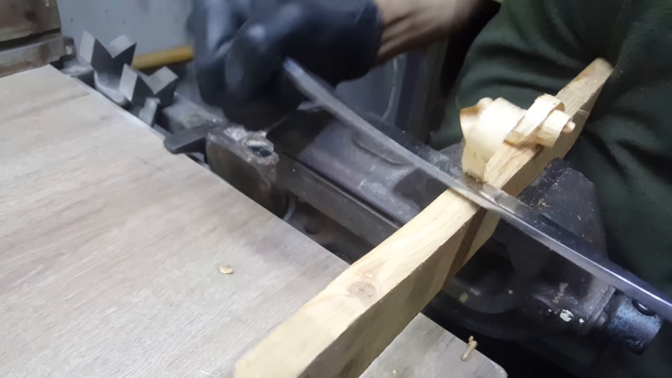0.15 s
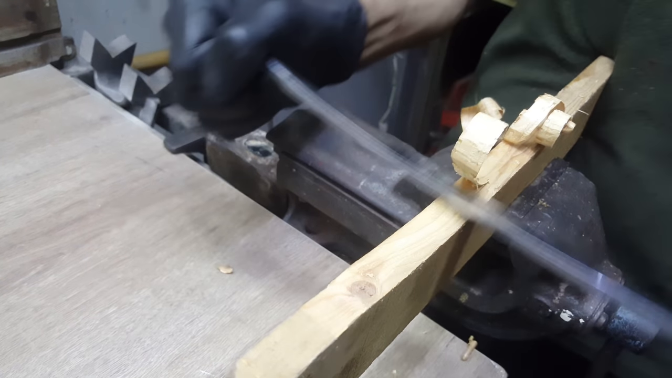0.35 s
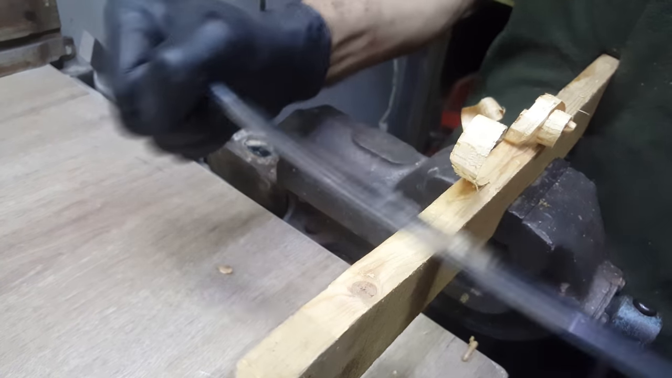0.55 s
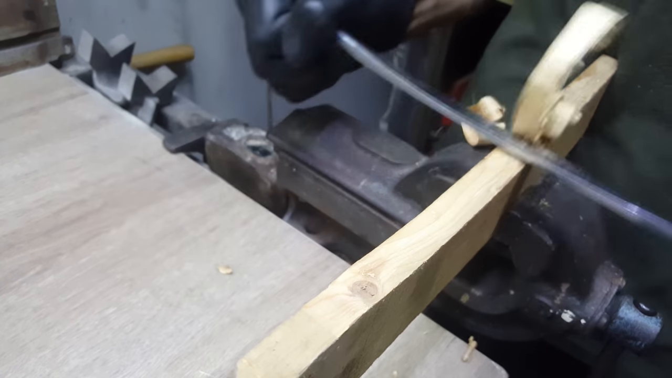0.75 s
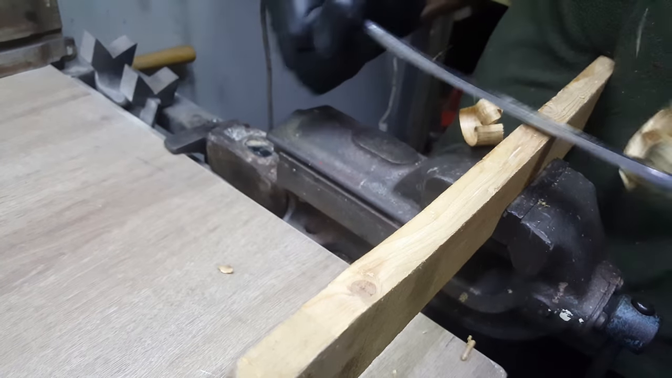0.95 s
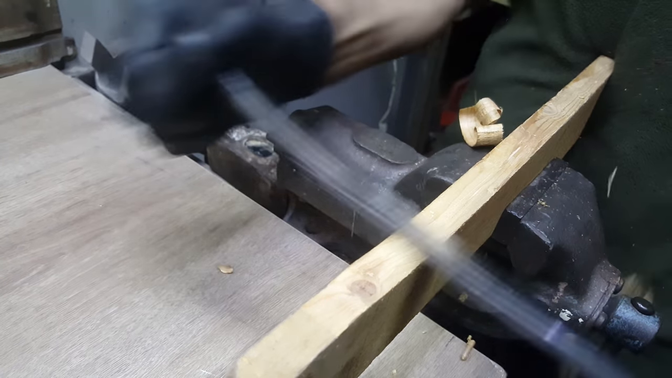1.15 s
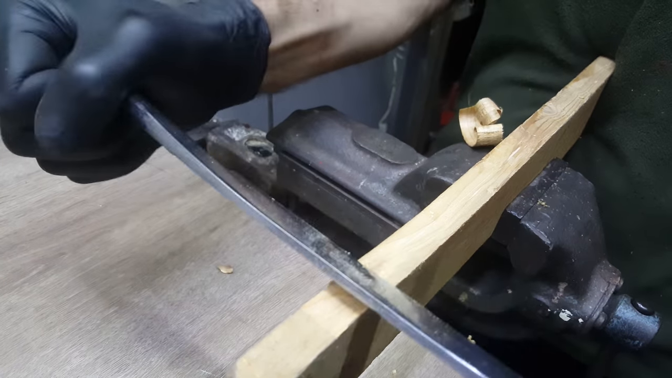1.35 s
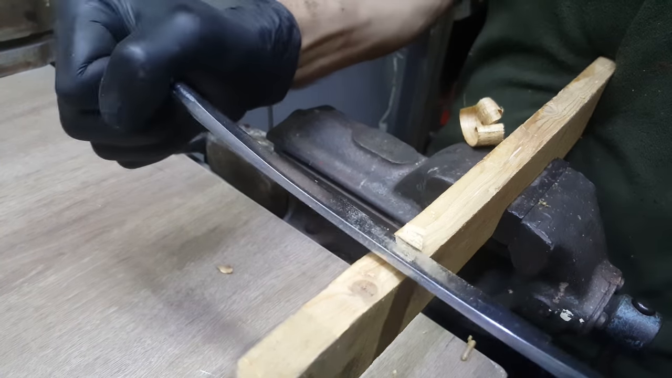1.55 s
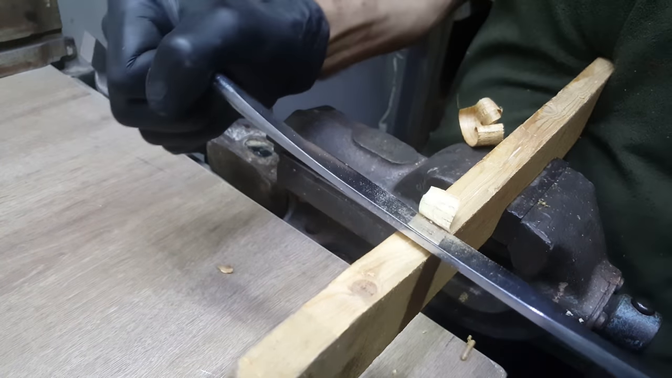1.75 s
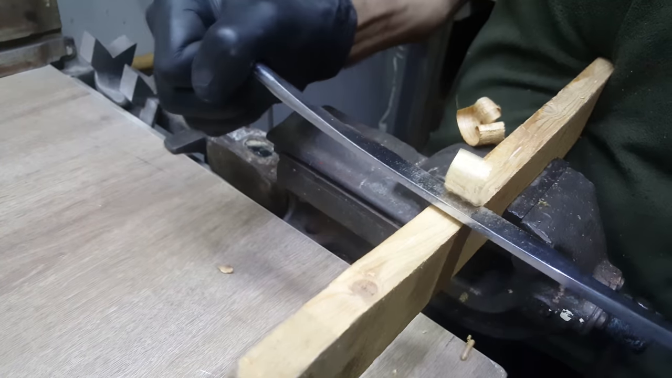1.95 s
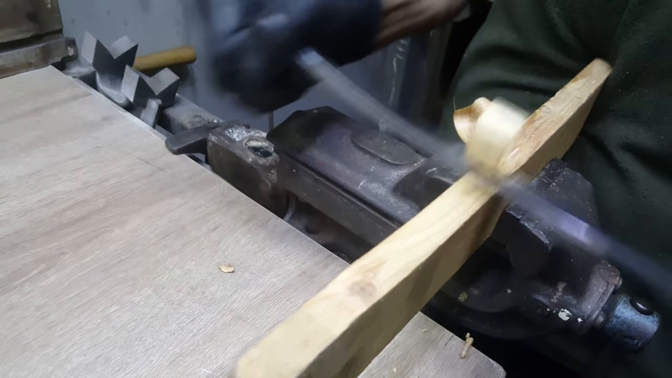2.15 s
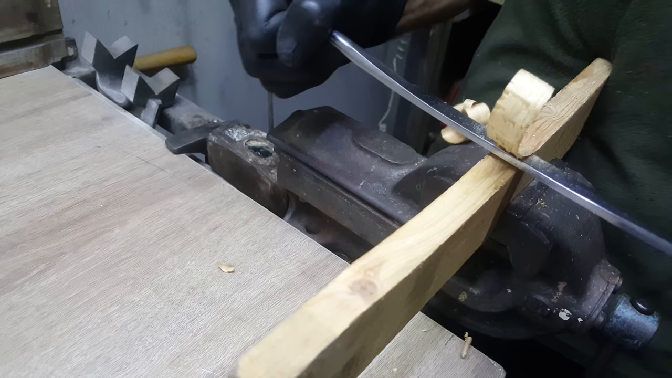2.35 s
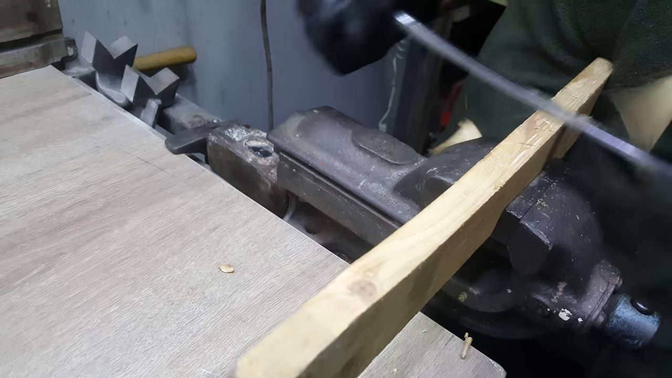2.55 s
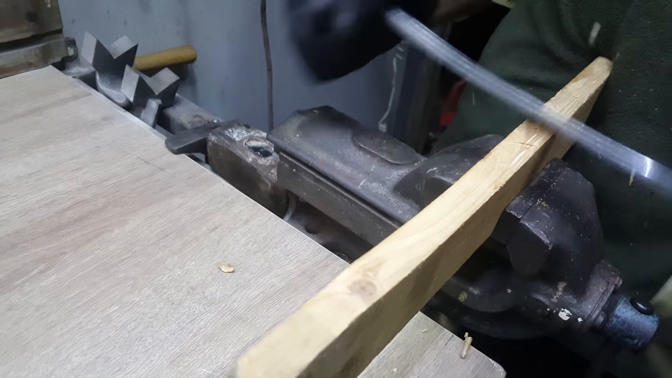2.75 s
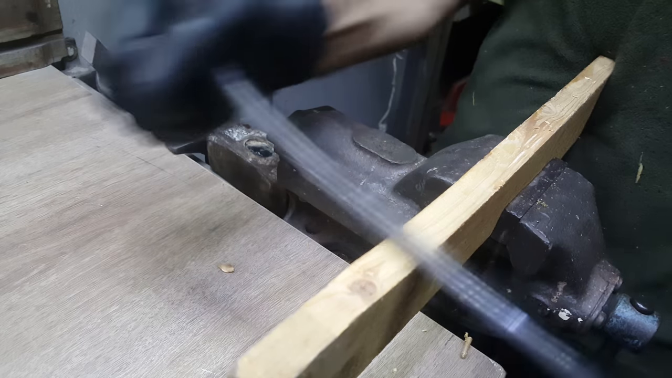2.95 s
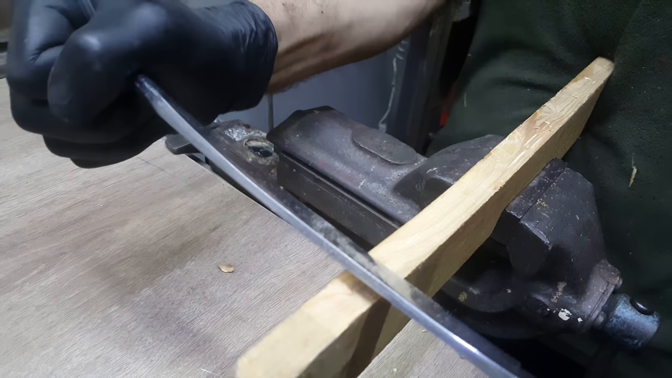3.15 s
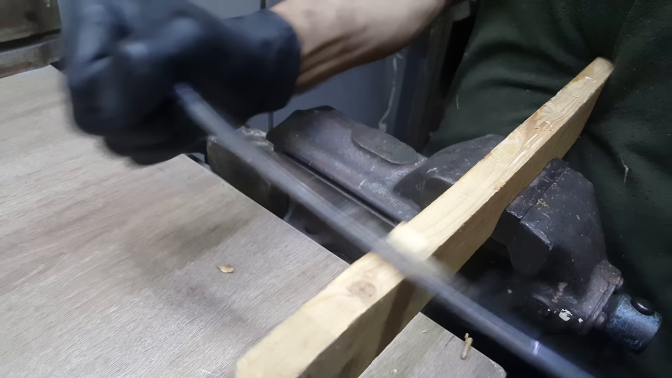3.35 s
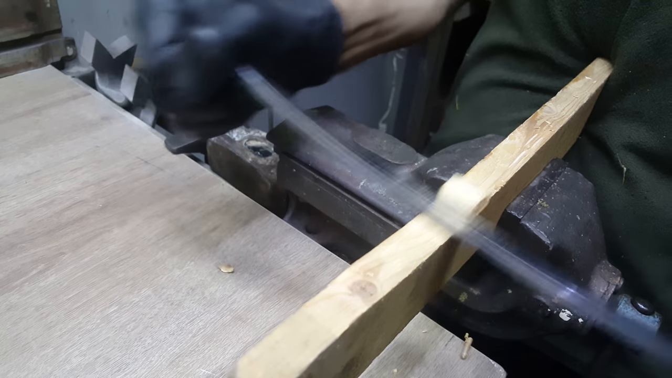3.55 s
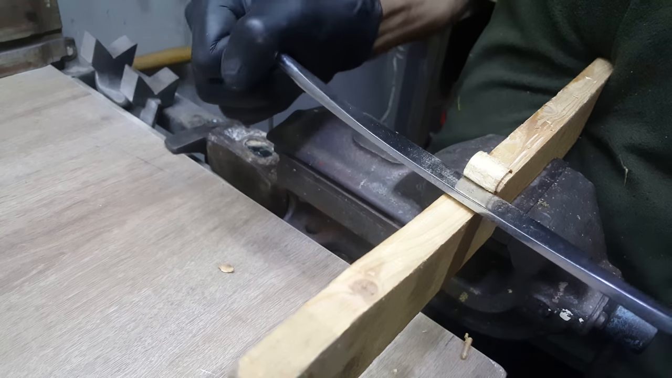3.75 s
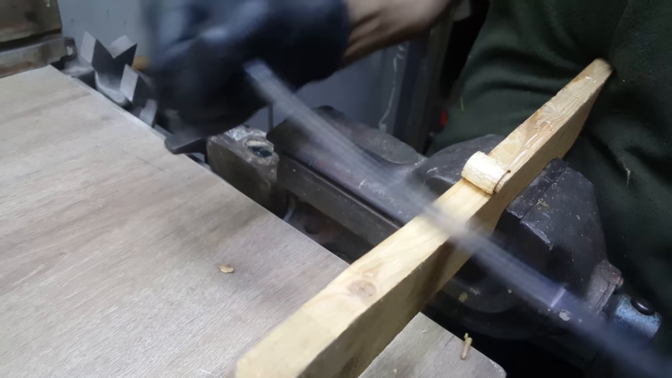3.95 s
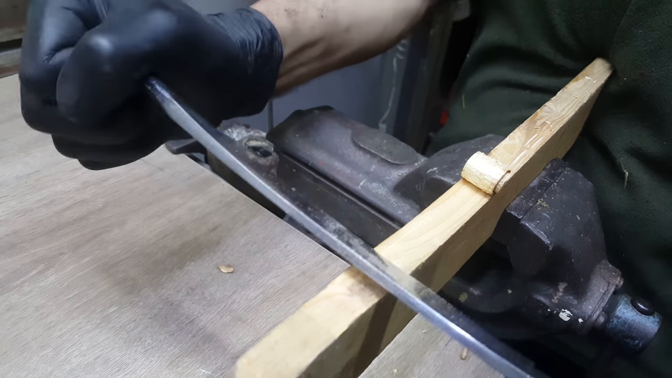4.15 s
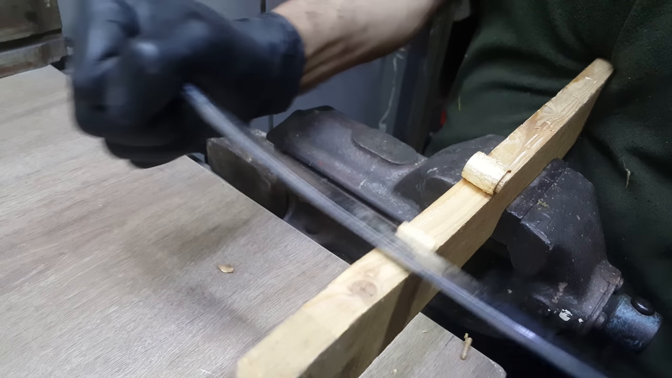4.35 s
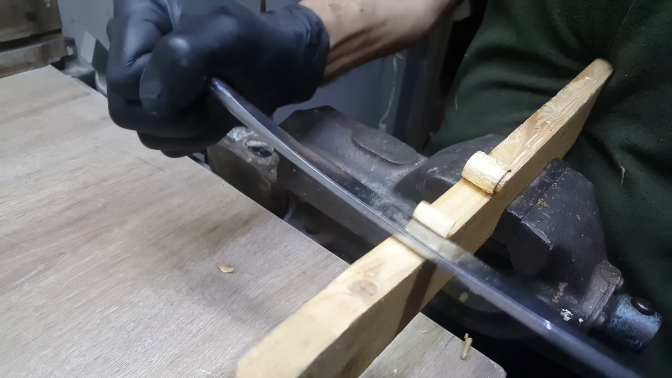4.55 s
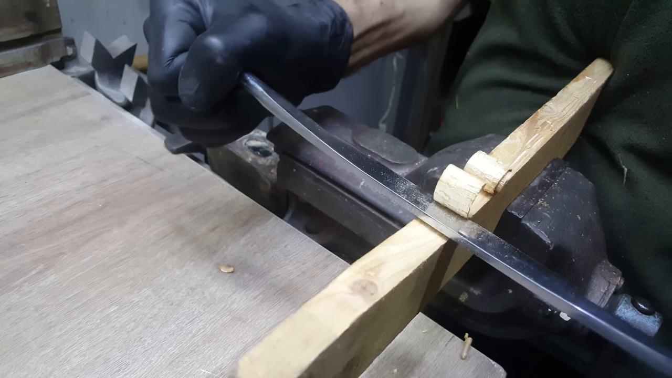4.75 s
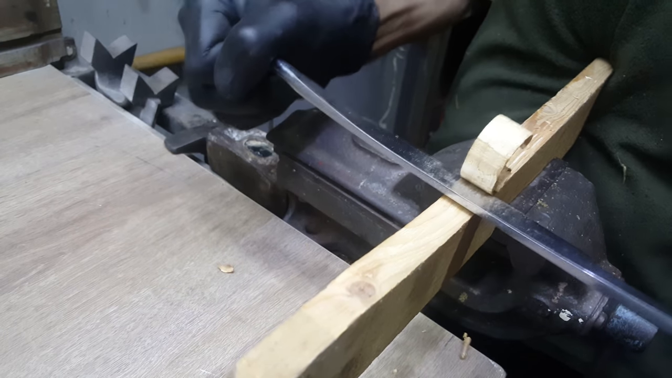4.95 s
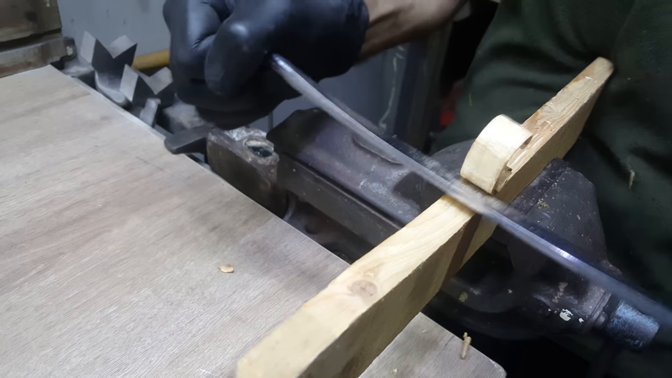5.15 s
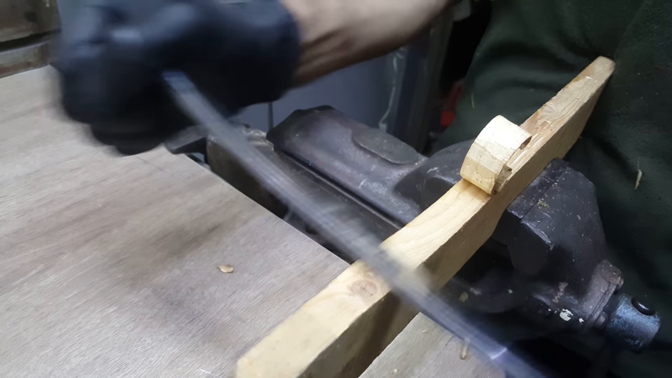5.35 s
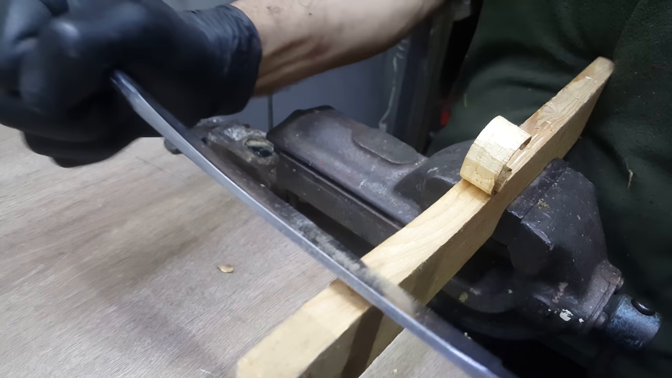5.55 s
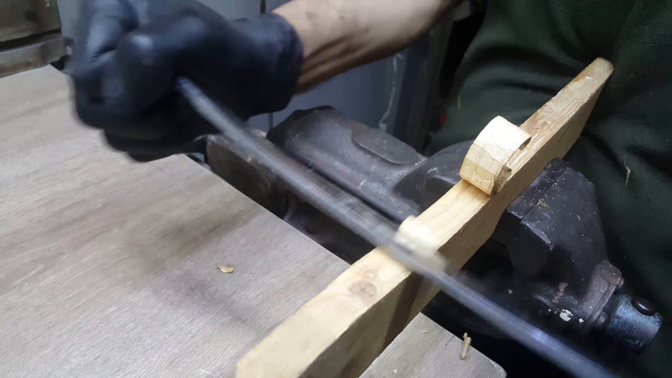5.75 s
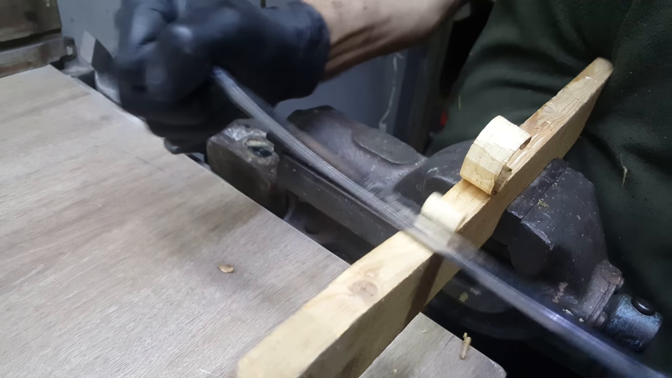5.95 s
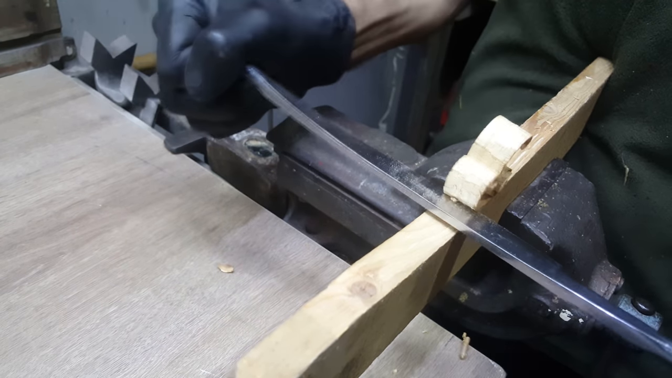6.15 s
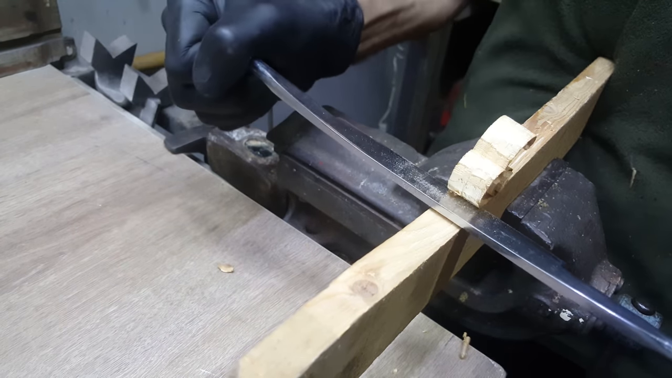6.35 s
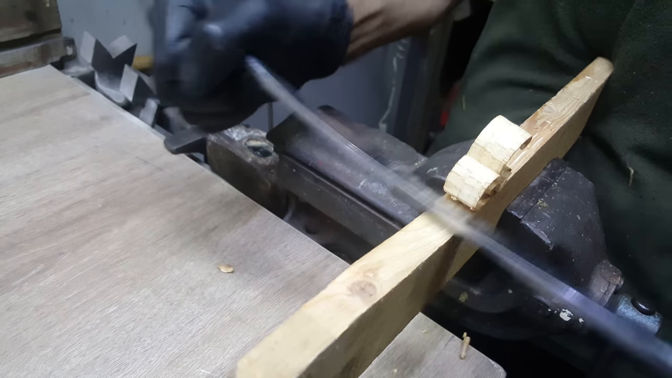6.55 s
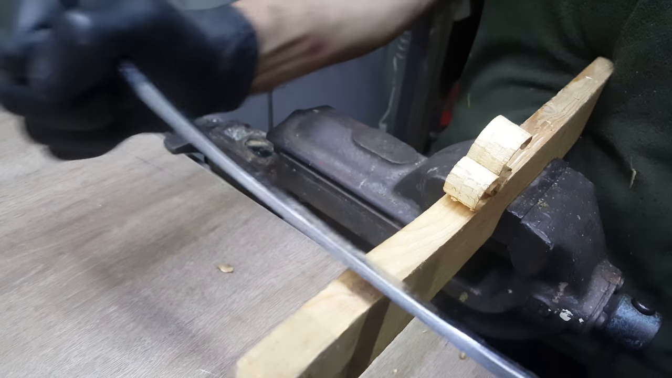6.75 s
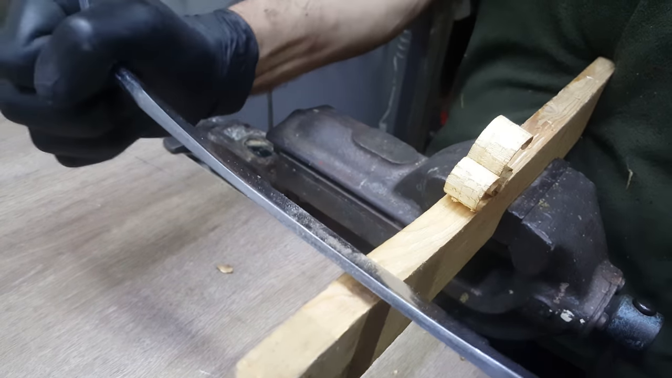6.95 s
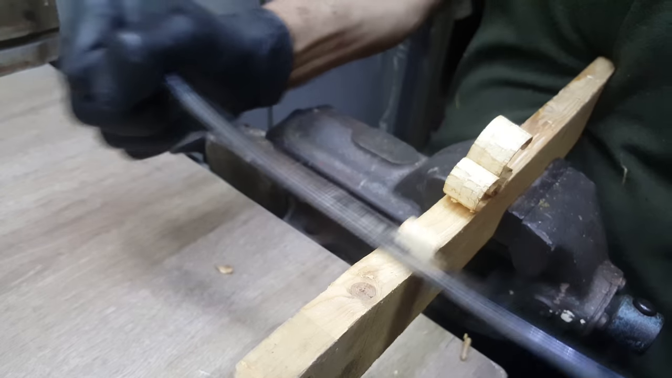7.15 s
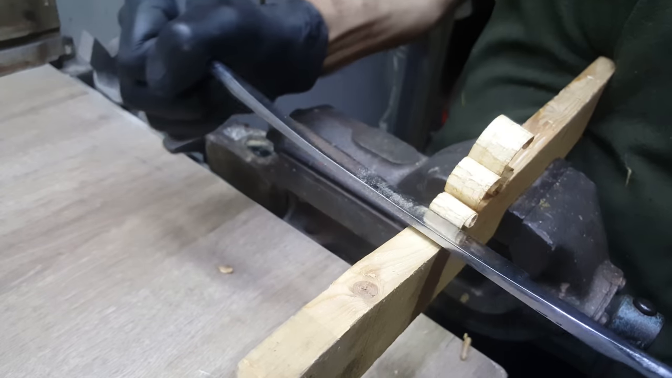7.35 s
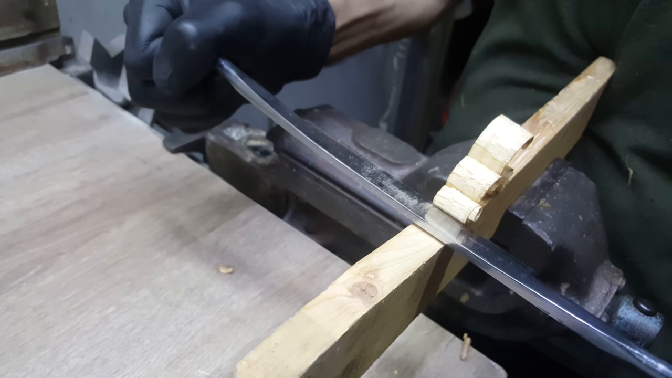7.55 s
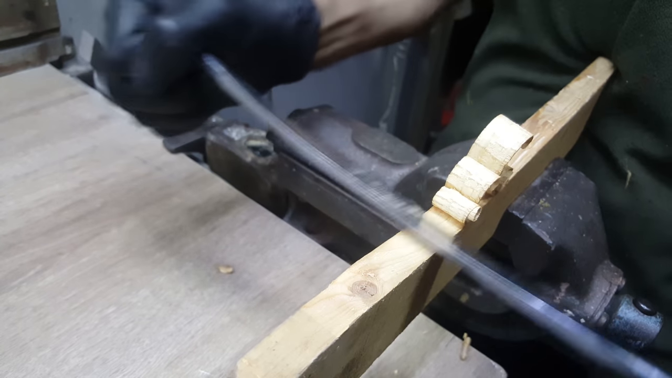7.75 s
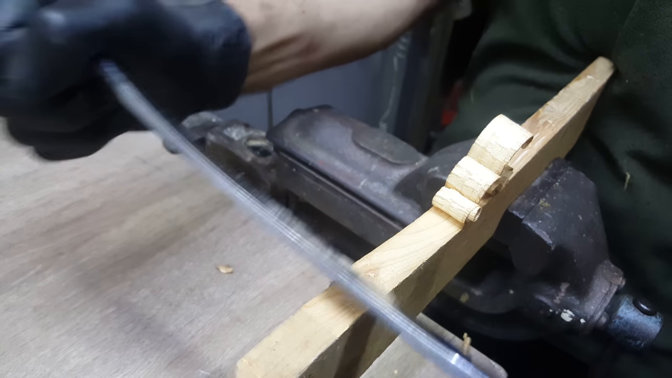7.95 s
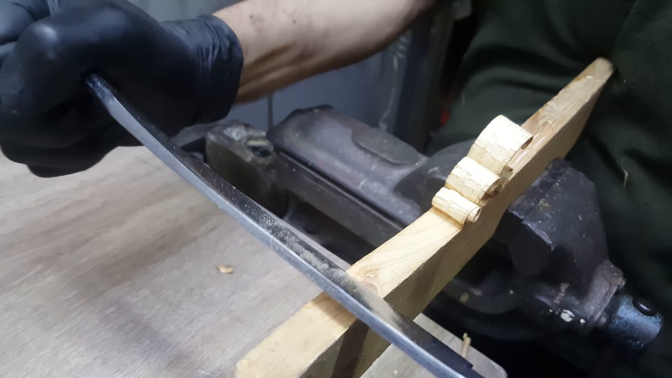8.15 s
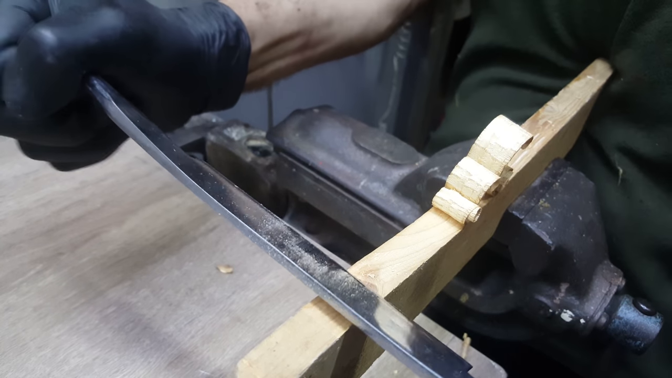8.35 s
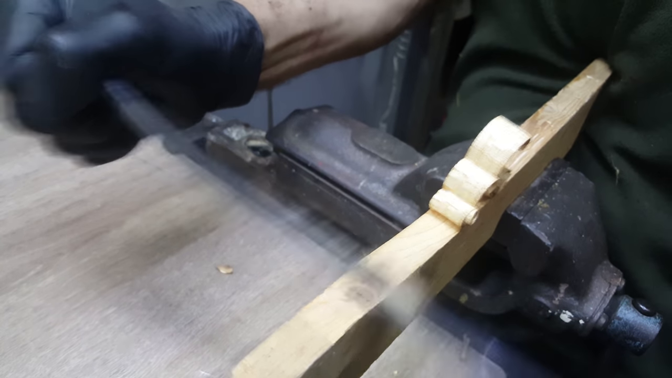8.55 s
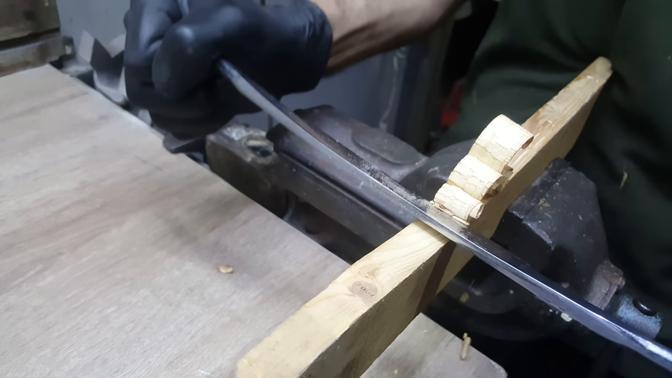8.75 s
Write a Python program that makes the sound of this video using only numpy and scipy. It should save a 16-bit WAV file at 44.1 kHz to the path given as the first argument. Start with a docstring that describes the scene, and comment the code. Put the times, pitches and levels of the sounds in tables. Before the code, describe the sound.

Close workshop woodcutting: a steel blade scrapes and crackles through wood in bursts, snapping splinters and thudding the bench, with ticks and light rubs between.

```python
"""A draw knife cuts along a softwood board clamped in a bench vise, close to two microphones in a small workshop.
The edge sticks and slips: uneven pushes shake bench and board, and sprays of tiny clicks make the rasp.
Splinters snap as hard clicks with noise bursts; sudden releases clunk and the bench lurches on low notes.
Between pulls the blade touches down with ticks and knocks, and slides back with a rub, a swish and a hiss.
The steel sings a few times as a wavering tone, near reflections and a room tail follow, and faint air runs on."""
import sys
import numpy as np
from scipy import signal
from scipy.fft import rfft, irfft, next_fast_len
from scipy.io import wavfile
from scipy.ndimage import uniform_filter1d

SR = 44100
rng = np.random.default_rng(int(sys.argv[2]) if len(sys.argv) > 2 else 0)


def wrap_up_sound(samples):
    """Save the sound to the file named by the first command line argument, as 16-bit audio."""
    columns = np.atleast_2d(samples).T
    # keep every value between -1 and 1, then stretch to whole-number steps
    tamed = np.clip(columns, -1, 1)
    steps = np.round(tamed * 32767).astype(np.int16)
    wavfile.write(sys.argv[1], SR, steps)


N = 392478
T = np.arange(N) / SR

# Event levels and mode strengths below are relative: each layer is trimmed again where it is mixed.

# the blade's bending mode sings: (start [s], end [s], level [dB])
SINGING_NOTES = [(-0.02, 0.125, -60.5), (1.81, 2.03, -58), (2.04, 2.175, -43.5)]
# splinters break: (start [s], crack [dB], woody body [dB], brittle top [dB])
SPLINTER_SNAPS = [(0.1339, -0.5, -10.5, -2.5), (0.153, -13, -19.5, -12), (0.1658, -15, 3, -16),
                  (0.1847, -15, -8.5, -5.5), (0.1967, -16, -7.5, -7.5), (0.718, -6.5, -9, -5.5),
                  (0.722, -4.5, -12, -8.5), (0.734, -7.5, -13.0, -5.5), (0.7804, -15, -2.5, -3.5),
                  (0.868, -13, -17.5, -16), (0.88, -18.5, -18.5, -19), (1.115, -42, -36, -51),
                  (1.8947, -18.5, -13.5, -22.5), (1.9253, -5.5, -15.5, -14), (1.9634, -3.5, -13.5, -12),
                  (2.0078, -10, -21, -22.5), (2.0731, -15.5, -31.5, -21), (2.1685, 1, -4.5, -14.5),
                  (2.2071, -4, -14, -11), (2.24, -2.5, -1.5, -10.5), (2.2569, -12.5, -15, -10.5),
                  (2.2788, -1.5, -16.0, -5.5), (2.2919, -6.5, -19, -4.5), (2.4188, -21, -39, -25),
                  (2.4803, -23.5, -15, -17), (2.5126, 0, -17.5, -5.5), (2.5665, -20, -11.5, -34),
                  (3.2162, -19.5, -26, -48), (3.594, -7, -16, -20), (3.7667, -16, -14.5, -25),
                  (3.8903, -35, -35, -47.5), (4.931, -8.5, -13, -10.5), (6.1526, -15.5, -14, -18.5),
                  (6.1775, -19, -11.5, -13), (6.2011, -20, -8, -13), (6.3355, -22, -30, -23.5),
                  (6.3438, -25, -23, -31), (6.59, -24.5, -26.5, -22.5), (7.3863, -20, -5, -27),
                  (7.417, -15, -13, -20), (8.3909, -27, -33, -34), (8.6201, -16, -11, -17.5)]
# each bite of the edge into the wood: (start [s], length [s], keenest cut [share of length],
# greatest load [share of length], bench shake [dB], board flex [dB], edge rasp [dB], fibre tearing [dB])
EDGE_BITES = [(0.136, 0.07, 0.38, 0.37, -14.5, -19.5, -31, -42.5),
              (0.638, 0.17, 0.34, 0.7, -20.5, -26, -31.5, -41.5),
              (0.844, 0.039, 1, 1.0, -26, -35, -47, -44),
              (1.464, 0.12, 0.74, 0.83, -30.5, -31, -39.5, -52.5),
              (1.678, 0.11, 0.39, 0.51, -23, -31, -39.5, -47),
              (1.89, 0.12, 0.41, 0.58, -17.5, -21.5, -37, -40),
              (2.167, 0.11, 0.47, 0.62, -18.5, -15.5, -33, -31),
              (2.294, 0.033, 0.026, 0.51, -22, -18, -41.5, -42),
              (2.433, 0.13, 0.76, 0.64, -32, -39.5, -47, -38),
              (3.212, 0.14, 0.53, 0.93, -33.5, -37.5, -50, -57),
              (3.375, 0.1, 0.48, 0.58, -29, -28, -34.5, -51.5),
              (3.54, 0.22, 0.29, 0.32, -20, -26.5, -34.5, -44),
              (4.307, 0.16, 0.59, 0.6, -26.5, -28.5, -37, -54),
              (4.523, 0.077, 0.14, 0.51, -25, -35.5, -44.5, -52.5),
              (4.636, 0.096, 0.56, 0.6, -21.5, -30, -40.0, -43),
              (4.931, 0.062, 0.46, 0.78, -17, -23.5, -33.5, -42),
              (5.014, 0.018, 0.15, 0.21, -22, -18.5, -39, -60.0),
              (5.637, 0.14, 0.58, 0.54, -32.0, -28.5, -35, -54),
              (5.801, 0.08, 0.6, 0.89, -21.5, -28.5, -40, -50.5),
              (5.967, 0.082, 0.6, 0.65, -23, -31, -41, -47.5),
              (6.147, 0.065, 0.73, 0.95, -18.5, -21.0, -35.0, -45),
              (6.231, 0.013, 0, 0.37, -21, -19, -42.5, -64),
              (7.101, 0.18, 0.41, 0.41, -26, -24.5, -32, -51.5),
              (7.355, 0.054, 0.54, 1, -18, -24, -36, -48.5),
              (7.561, 0.046, 0.11, 1.0, -23, -35, -44.5, -57.5),
              (8.611, 0.12, 0.053, 0.33, -26.0, -37, -33.5, -50)]
# the edge breaks free and the board springs back: (time [s], kick [dB])
BOARD_JOLTS = [(0.152, -5.5), (2.237, -6), (3.672, -14.5), (5.017, -4.5), (6.018, -20), (6.237, -6.5),
               (7.608, -33)]
# the edge digs in and the bench lurches: (time of widest swing [s], peak [dB], pitch [Hz])
BENCH_LURCHES = [(0.173, -24, 145.4), (0.239, -16.5, 163.6), (0.771, -17.5, 124), (0.915, -26, 107),
                 (1.01, -31, 107.3), (1.99, -12.5, 106.2), (3.679, -11, 111.5), (3.832, -31, 109.5),
                 (4.729, -21.5, 148.5), (5.008, -15.5, 157.2), (7.405, -24.5, 108)]
# the blade slides back: (start [s], length [s], fastest [share of length], pressed most [share of length],
# board rub [dB], swish [dB], surface hiss [dB])
BLADE_RETURNS = [(0.422, 0.2, 0.38, 0.57, -45.5, -49.0, -56.5),
                 (1.206, 0.26, 0.01, 0.03, -46.5, -46.5, -57), (2.879, 0.064, 0.05, 0.5, -45, -50.0, -50.5),
                 (3.008, 0.14, 0.054, 0.13, -43, -44.5, -52.5),
                 (3.949, 0.25, 0.42, 0.48, -48.5, -51, -55.5),
                 (5.206, 0.29, 0.72, 0.71, -39.0, -50.5, -55.5), (6.59, 0.25, 0.56, 0.7, -46.5, -51.5, -53),
                 (7.877, 0.19, 0.77, 0.83, -39.5, -49.5, -59)]
# the blade touches the board: (time [s], tick [dB], knock relative to the tick [dB])
BLADE_TOUCHES = [(0.5297, -36.5, -1), (1.2005, -33, -1), (1.6806, -31.5, -5.5), (2.718, -54.5, -2),
                 (2.8732, -38, -9), (3.0051, -45, -1), (3.0939, -34.5, -5), (5.9688, -31, -27),
                 (7.032, -40.5, -18), (7.084, -29.5, -15), (7.1067, -24.5, -33), (7.3519, -27.5, -7.5),
                 (8.077, -28.5, -15), (8.3906, -38, -37), (8.4505, -40, -16), (8.618, -23.5, -12.5)]
# the edge grazes the wood without cutting: (start [s], length [s], level [dB])
EDGE_GRAZES = [(1.212, 0.0083, -55.5), (2.879, 0.013, -43.5), (2.999, 0.012, -58.5), (4.25, 0.039, -64),
               (5.28, .1, -61), (5.603, 0.047, -63), (7.77, 0.062, -62.5)]

# how each sound follows a stroke: (rise to the crest [dB/s], sag after it [dB/s], release [dB/s],
# lingering tail [dB], fall of that tail [dB/s])
SHAKE_SHAPE = (200, 31, 116, -20.5, 35)
FLEX_SHAPE = (190.5, 56.5, 199.5, -15.5, 82)
RASP_SHAPE = (188, 98, 331, -34, 48.5)
TEAR_SHAPE = (148.5, 37, 710, -21, 111)
RUB_SHAPE = (109, 41, 191, -24, 85.5)
SWISH_SHAPE = (85, 115, 256, -25, 85)
HISS_SHAPE = (61, 87.5, 203, 6, 73.5)
GRAZE_SHAPE = (66, 66, 433, -31, 122)

# resonances of bench and vise: (centre [Hz], width [Hz], strength [dB])
BENCH_MODES = [(36, 12, -16.5), (71.5, 9, -8), (108.9, 5.36, 3.5), (130.6, 3.04, 2.5), (164.26, 4.77, 3.5),
               (230.5, 48, -11.5)]
# resonances of the clamped board: (centre [Hz], width [Hz], strength [dB])
BOARD_MODES = [(220.3, 12.3, 4), (258, 19.9, 1.5), (349.4, 55.5, -2), (391.8, 37.3, 0), (494.6, 70, -9.5),
               (617.6, 33, -7), (710, 590, -19.5)]
# ringing of the blade while it is pressed into the wood: (centre [Hz], width [Hz], strength [dB])
EDGE_MODES = [(1050, 57, -16.5), (1387, 77, 13.5), (1646, 40, 4.5), (2299, 100, 11), (2455, 38, -1),
              (2793, 170, 13.5), (4286, 400, 0), (7530, 320, -7), (8100, 130, -8), (11200, 450, -16.5)]

# colour of steel scraping wood: (frequency [Hz], relative level [dB per Hz])
RASP_COLOUR = [(300, -23), (600, -9.5), (800, -5.5), (1050, -6.5), (1650, -5.5), (1950, -5.5), (2650, -2.5),
               (3600, -5), (4450, -11.5), (5500, -15), (6900, -15), (8100, -7.5), (9000, -17.5),
               (10200, -30.5)]
# colour of tearing fibres: (frequency [Hz], relative level [dB per Hz])
TEAR_COLOUR = [(1200, -18), (3000, 2), (4500, -10.5), (6500, 6), (8200, 8), (9200, 0), (10100, 2),
               (12000, 5), (15600, -0.5), (16300, -40.5)]
# colour of a splinter's crack: (frequency [Hz], relative level [dB per Hz])
CRACK_COLOUR = [(1200, -12.5), (3000, -4), (4500, -3), (6500, 6.5), (8200, 9), (9200, 4), (10500, -4.5),
                (16000, -22)]
# colour of a splinter's brittle top: (frequency [Hz], relative level [dB per Hz])
BRITTLE_COLOUR = [(6000, -32), (10000, 1.5), (12000, 2.5), (15600, -2.5), (16300, -15.5)]
# colour of the blade rubbing on the board: (frequency [Hz], relative level [dB per Hz])
RUB_COLOUR = [(53, -33), (90, -15), (113, 1), (204, -9), (259, 5), (348, -22), (447, -10), (491, -39),
              (545, -21), (874, -17.5), (1100, -34), (1430, -99), (2420, -120)]
# colour of the hiss from the fresh surface: (frequency [Hz], relative level [dB per Hz])
SURFACE_COLOUR = [(600, -21.5), (1050, -5.5), (1400, -1.5), (1900, -9.5), (3000, 0.5), (3700, -11),
                  (5100, -8.5), (6500, -10), (8100, -2.5), (10200, -23), (11600, -13), (16000, -23)]
# colour of the hollow wooden knock: (frequency [Hz], relative level [dB per Hz])
KNOCK_COLOUR = [(110, -13), (200, -29), (300, 9.5), (440, -6.5), (570, 9), (680, 6), (850, -12.5),
                (1500, -50)]
# colour of the air: (frequency [Hz], relative level [dB per Hz])
AIR_COLOUR = [(15, -24.5), (25, 7.5), (317, -6), (796, -13), (1290, -12.5), (1400, -16), (1650, -18.5),
              (1890, -15), (2690, -19), (6920, -25), (8140, -24), (9320, -32), (16000, -25.5)]

# near reflections over direct sound: (frequency [Hz], gain [ratio])
NEAR_GAIN = [(100, 0.054), (250, 0.39), (500, 0.56), (1200, 0.94), (4000, 1), (14000, 0.67)]
# how long the room rings: (frequency [Hz], time to fall 60 dB [s])
ROOM_DECAY = [(100, 0.25), (400, 0.18), (2000, 0.59), (8000, 0.37), (15000, 0.26)]
# colour difference of the two microphones: (frequency [Hz], left minus right [dB])
MICROPHONE_LEAN = [(50, -0.5), (120, -1.5), (250, -2), (600, -1), (1200, -4), (2300, -2), (4400, -3.5),
                   (8000, -4), (15000, 2.5)]

BLADE_HZ, SING_WAVER_DB = 1426, 1.5
SING_ATTACK_S, SING_FALL_DB_PER_S = .022, 169
HUM_DB, HUM_FALL_DB_PER_S = -36, 133  # the bench, still ringing at the start
SPLINTER_T60_S = .005
LURCH_BUILD_DB_PER_S, LURCH_FALL_DB_PER_S = 331, 262.5
SWISH_HZ, SWISH_GLIDE_HZ = 495, 109  # centre of the swish as a slide begins, and its rise over the slide
GRAZE_CREST = 0.24  # share of the length
ENTRY_SHARE = 0.13  # a stroke eases in over this share of the time to its crest
TOP_HZ = 16650  # nothing is kept from here up


def amp(db):
    """Turn decibels into gain."""
    return 10 ** (np.asarray(db) / 20)


def unit(x):
    """Scale to an rms (average strength) of 1."""
    return x / np.sqrt(np.mean(x ** 2) + 1e-20)


def even(x, span):
    """Hold the rms near 1 over span seconds, keeping the faster grain."""
    window = signal.windows.hann(int(span * SR))
    power = signal.fftconvolve(unit(x) ** 2, window / window.sum(), "same")
    return unit(x) / np.sqrt(np.abs(power) + 1e-4)


def along(points, hz):
    """Read (frequency, value) points on a log frequency axis."""
    f, v = np.transpose(points)
    return np.interp(np.log(hz + 1), np.log(f + 1), v)


def filtered(x, response):
    """Multiply the spectrum of x by a response, given as a function of frequency."""
    m = next_fast_len(N + SR, True)
    return irfft(rfft(x, m) * response(np.fft.rfftfreq(m, 1 / SR)), m)[..., :N]


def coloured(x, spectrum):
    """Give x a colour with a filter of energy 1 that never sounds ahead of its input."""
    size = 4096
    hz = np.fft.rfftfreq(size, 1 / SR)
    cepstrum = irfft(np.log(amp(along(spectrum, hz)) + 1e-6))
    # folding the cepstrum forward puts the filter's energy as early as possible
    cepstrum[1:size // 2] *= 2
    cepstrum[size // 2 + 1:] = 0
    kernel = irfft(np.exp(rfft(cepstrum)))
    return signal.oaconvolve(x, kernel / np.linalg.norm(kernel))[:N]


def modes(table, hz):
    """Response of a set of resonances, with alternating signs."""
    total = 0
    for k, (centre, width, db) in enumerate(table):
        damping = 1j * hz * width
        total = total + (-1) ** k * amp(db) * damping / (centre * centre - hz * hz + damping)
    return total


def edge_ringing(hz):
    """Response of the pressed blade, with the lows held back."""
    return modes(EDGE_MODES, hz) / (1 + (700 / (hz + 1)) ** 4)


def grains(rate, spread_db):
    """Random tiny clicks of unequal size and either sign, about rate a second."""
    present = rng.random(N) < rate / SR
    sign = rng.choice([-1, 1], N)
    return present * sign * amp(spread_db * np.clip(rng.standard_normal(N), -2, 2))


def bursts(rows, t60, tail_db, tail_t60):
    """For each (time [s], level [dB]) a sharp noise burst with a weaker, longer tail."""
    out, t = np.zeros(N + SR), np.arange(SR // 4) / SR
    shape = amp(-60 * t / t60) + amp(tail_db - 60 * t / tail_t60)
    for s, db in rows:
        out[int(s * SR):][:len(t)] += amp(db) * shape * rng.standard_normal(len(t))
    return out[:N]


def stroke(start, length, crest, db, shape, attack):
    """Gain of a set of strokes: each catches, builds to its crest, sags to its end and rings out."""
    rise, sag, release, tail_db, tail_fall = shape
    total = np.zeros(N)
    for s, n, share, level in zip(start, length, np.clip(crest, 0, 1), db):
        span = slice(max(int((s - attack) * SR), 0), int((s + 1) * SR))
        age = T[span] - s
        crest_s = share * n
        build_db = -rise * np.maximum(crest_s - age, 0)
        sag_db = -sag * np.maximum(np.minimum(age, n) - crest_s, 0)
        after = np.maximum(age - n, 0)
        ring_db = np.maximum(-release * after, tail_db - tail_fall * after)
        entry = np.clip((age + attack) / (attack + ENTRY_SHARE * crest_s), 0, 1)
        total[span] = np.maximum(total[span], entry * amp(level + build_db + sag_db + ring_db))
    return total


def room_tone():
    """Faint steady air: coloured noise, with a smaller part shared by both sides."""
    mid, left, right = (coloured(rng.standard_normal(N), AIR_COLOUR) for _ in range(3))
    return amp(-67) * mid + amp(-63.5) * np.array([left, right])


def singing():
    """The blade rings on one slightly unsteady note; at first the bench still hums from the pull before."""
    drift = unit(uniform_filter1d(rng.standard_normal(N), size=900))
    note = np.sqrt(2) * np.sin(2 * np.pi * np.cumsum(BLADE_HZ + 3 * drift) / SR)
    note = note * amp(SING_WAVER_DB * drift)
    # faint rubbing under the note
    friction = unit(coloured(grains(rate=2600, spread_db=5), RASP_COLOUR))
    levels = []
    for s, end, db in SINGING_NOTES:
        fade_in = np.clip((T - s) / SING_ATTACK_S + .5, 0, 1)
        levels.append(fade_in * amp(db - SING_FALL_DB_PER_S * np.maximum(T - end, 0)))
    sung = np.max(levels, axis=0)

    def hum_response(hz):
        """Bench and board together, with the highs held back."""
        return (modes(BENCH_MODES, hz) + modes(BOARD_MODES, hz)) / (1 + (hz / 260) ** 4)

    hum = even(filtered(rng.standard_normal(N), hum_response), span=.07)
    return sung * (note + amp(-16) * friction) + amp(HUM_DB - HUM_FALL_DB_PER_S * T) * hum


def snaps(lead=0.001):
    """A splinter creaks for a millisecond, then breaks with a hard crack, a woody body and a brittle top."""
    clicks = np.zeros((3, N))
    for s, *levels in SPLINTER_SNAPS:
        clicks[:, int((s + lead) * SR)] = amp(levels)
    crack_rows = [(s, crack_db) for s, crack_db, body_db, top_db in SPLINTER_SNAPS]
    top_rows = [(s, top_db) for s, crack_db, body_db, top_db in SPLINTER_SNAPS]
    splinters = bursts(crack_rows, t60=SPLINTER_T60_S, tail_db=-21.5, tail_t60=0.06)
    shards = bursts(top_rows, t60=SPLINTER_T60_S, tail_db=-25.5, tail_t60=0.04)
    crack = coloured(clicks[0] + amp(-17.5) * splinters, CRACK_COLOUR)
    body = coloured(clicks[1], RASP_COLOUR)
    top = coloured(clicks[2] + amp(-14) * shards, BRITTLE_COLOUR)
    return amp(-2.5) * crack + amp(-2) * body + amp(-2.0) * top


def stick_slip(rate, scatter, spread_db):
    """The edge catches and lets go at uneven intervals, typically 1 / rate seconds: one push for each slip."""
    draws = rng.standard_normal((4000, 2))
    gaps = np.exp(scatter * draws[:, 0]) / rate
    at = (np.cumsum(gaps) * SR).astype(int)
    return np.bincount(at, amp(spread_db * draws[:, 1]), N)[:N]


def fibres(spray, coarse):
    """Rasp, blade ring and crackle at one microphone: its own view of the fine fibres, plus shared cracks."""
    scrape = unit(grains(rate=8000, spread_db=4) * (.6 + spray)) + .8 * coarse
    rasp = even(coloured(scrape, RASP_COLOUR), span=0.037)
    ring = even(filtered(scrape, edge_ringing), span=0.044)
    splitting = unit(grains(rate=4000, spread_db=6) * (.5 + spray)) + .7 * coarse
    crackle = even(coloured(splitting, TEAR_COLOUR), span=0.054)
    return rasp, ring, crackle


def cutting():
    """Each slip jolts bench and board and breaks a spray of fibres."""
    start, length, keenest, loaded, shake_db, flex_db, rasp_db, tear_db = np.transpose(EDGE_BITES)
    shake = stroke(start, length, loaded, shake_db, SHAKE_SHAPE, attack=0.0023)
    flex = stroke(start, length, loaded, flex_db, FLEX_SHAPE, attack=0.003)
    bite = stroke(start, length, keenest, rasp_db, RASP_SHAPE, attack=0.0054)
    tearing = stroke(start, length, keenest, tear_db, TEAR_SHAPE, attack=.006)
    slips = stick_slip(rate=105, scatter=.55, spread_db=3)
    pushes = even(slips - uniform_filter1d(slips, size=1024), span=0.38)
    force = pushes + .5 * unit(grains(rate=1600, spread_db=2.0))
    bench = filtered(force, lambda hz: modes(BENCH_MODES, hz) / (1 + (hz / 300) ** 4))
    board = filtered(force, lambda hz: modes(BOARD_MODES, hz) / (1 + (hz / 1300) ** 4))
    bench, board = even(bench, span=0.058), even(board, span=0.23)
    # fine fibres part in a spray that dies away after each slip
    spray = even(signal.lfilter([1], [1, -np.exp(-1 / (0.0043 * SR))], slips), span=0.023)
    # now and then a coarse bundle cracks in all bands at once
    coarse = unit(grains(rate=330, spread_db=6.5) * (0.7 + spray))
    rasp, ring, crackle = np.stack([fibres(spray, coarse), fibres(spray, coarse)], axis=1)
    # a smooth cut keeps the steel in contact and ringing; tearing ahead of the edge favours the plain rasp
    contact = bite / (bite + 2 * tearing + 1e-9)
    edge = contact * ring + np.sqrt(1 - contact ** 2) * rasp
    shaking = amp(-2.0) * shake * bench + amp(-2.0) * flex * board
    return shaking + amp(6.0) * bite * edge + amp(1.5) * tearing * crackle


def jolts():
    """A sudden release kicks the board's resonances with a hollow clunk."""
    kicks = bursts(BOARD_JOLTS, t60=0.029, tail_db=-3, tail_t60=0.24)
    ring = filtered(kicks, lambda hz: modes(BOARD_MODES, hz) * hz / (hz + 400) / (1 + (hz / 1500) ** 4))
    clunk = filtered(kicks, lambda hz: modes([(640, 170, -4.5)], hz) / (1 + (hz / 1500) ** 4))
    return amp(3.5) * ring + amp(4.5) * clunk


def lurches():
    """For a few cycles the slipping edge keeps time with the bench, which swings up and rings down."""
    out, t = np.zeros(N + SR), np.arange(-SR // 8, SR // 4) / SR
    swell = amp(np.minimum(LURCH_BUILD_DB_PER_S * t, -LURCH_FALL_DB_PER_S * t))
    for (s, db, hz), phase in zip(BENCH_LURCHES, rng.random(len(BENCH_LURCHES))):
        swing = np.sin(2 * np.pi * (hz * t + phase))
        out[int((s + t[0]) * SR):][:len(t)] += amp(db) * swell * swing
    return out[:N]


def sliding_back():
    """The unloaded blade rubs over the fresh surface; the swish rises in pitch as it travels."""
    start, length, fastest, pressed, rub_db, swish_db, hiss_db = np.transpose(BLADE_RETURNS)
    rub = stroke(start, length, pressed, rub_db, RUB_SHAPE, attack=0.0047)
    sweep = stroke(start, length, pressed, swish_db, SWISH_SHAPE, attack=0.0036)
    hiss = stroke(start, length, fastest, hiss_db, HISS_SHAPE, attack=0.015)
    slide = np.maximum(np.searchsorted(start, T) - 1, 0)  # which slide each moment belongs to
    progress = np.clip((T - start[slide]) / length[slide], 0, 1)
    centre_hz = SWISH_HZ + SWISH_GLIDE_HZ * progress
    # slow noise times a gliding tone makes a moving band of noise
    band = filtered(rng.standard_normal(N), lambda hz: 1 / (1 + (hz / 80) ** 2))
    swish = even(band * np.sin(2 * np.pi * np.cumsum(centre_hz) / SR), span=0.33)
    body = even(coloured(grains(rate=950, spread_db=5), RUB_COLOUR), span=0.16)
    rough = grains(rate=600, spread_db=9.0)
    board = filtered(rough, lambda hz: modes([(267, 94, 0)], hz) / (1 + (hz / 500) ** 4))
    board = even(board, span=0.026)
    sides = [coloured(grains(rate=4600, spread_db=9.5), SURFACE_COLOUR) for side in range(2)]
    surface = unit(np.array(sides))
    rubbing = rub * (amp(-4.5) * body + amp(-6.5) * board)
    return rubbing + amp(-1.5) * sweep * swish + amp(-5) * hiss * surface


def touches():
    """Steel meets wood: a scratchy tick and a hollow knock."""
    tick_rows = [(s, db) for s, db, knock_db in BLADE_TOUCHES]
    knock_rows = [(s, db + knock_db) for s, db, knock_db in BLADE_TOUCHES]
    tick = bursts(tick_rows, t60=0.0066, tail_db=-16, tail_t60=.12)
    knock = bursts(knock_rows, t60=0.082, tail_db=-1.5, tail_t60=.17)
    return amp(-5.0) * coloured(tick, RASP_COLOUR) + amp(-8) * coloured(knock, KNOCK_COLOUR)


def grazing():
    """A light touch of the moving edge scratches the wood and sets the steel ringing."""
    start, length, db = np.transpose(EDGE_GRAZES)
    level = stroke(start, length, np.full(len(start), GRAZE_CREST), db, GRAZE_SHAPE, attack=0.0042)
    scratch = np.array([grains(rate=3500, spread_db=3) for side in range(2)])
    ring = filtered(scratch, lambda hz: edge_ringing(hz) / (1 + (hz / 6000) ** 2))
    return amp(2.0) * level * unit(ring)


def near_reflections(x, t60):
    """Quick echoes off bench top, vise and hands; their pattern changes as the blade travels."""
    hop, taps = 2048, 1024
    padded = np.pad(x, (hop, 2 * hop))
    pieces = np.lib.stride_tricks.sliding_window_view(padded, 2 * hop)[::hop]
    t = np.arange(taps) / SR
    # each overlapping piece gets its own random echo pattern on each side
    echoes = rng.standard_normal((2, len(pieces), taps)) * amp(-60 * t / t60) * (t > .0005)
    echoes /= np.linalg.norm(echoes, axis=2, keepdims=True)
    heard = signal.fftconvolve((pieces * signal.windows.cosine(2 * hop))[None], echoes, axes=2)
    out = np.zeros((2, N + SR))
    for k in range(len(pieces)):
        out[:, k * hop:k * hop + heard.shape[2]] += heard[:, k]
    return out[:, hop:hop + N]


def diffuse(t60s):
    """A stereo room tail of energy 1 a side: noise whose frequencies each die at their own speed."""
    hz, t, z = signal.stft(rng.standard_normal((2, SR * 3 // 4)), SR, nperseg=256)
    decay = amp(-60 * t / along(t60s, hz)[:, None])
    tail = signal.istft(z * decay, SR, nperseg=256)[1]
    return tail / np.linalg.norm(tail, axis=1, keepdims=True)


def workshop(x, near_t60=.035, room_db=-14, lag=0.0002513):
    """Direct sound, reaching the right microphone first, then near reflections, then the room."""
    source = x.mean(axis=0)
    sides = np.array([[-1], [1]])
    # the lag in seconds is approached in the treble and shrinks towards the bass
    direct = filtered(x, lambda hz: np.exp(1j * np.pi * hz * lag * hz / (hz + 900) * sides))
    near = filtered(near_reflections(source, near_t60), lambda hz: along(NEAR_GAIN, hz))
    delayed = np.pad(source, (int(.008 * SR), 0))
    room = signal.fftconvolve(delayed[None], diffuse(ROOM_DECAY), axes=1)[:, :N]
    return direct + near + amp(room_db) * room


def scene():
    """All the work at the bench, heard in the room; the blade's note and early hum come directly."""
    work = snaps() + cutting() + jolts() + lurches() + sliding_back() + touches() + grazing()
    return workshop(work) + singing() + room_tone()


def record(dry):
    """The two microphones differ a little in colour; nothing is kept above the band limit."""
    halves = np.array([[.5], [-.5]])
    return filtered(dry, lambda hz: amp(along(MICROPHONE_LEAN, hz) * halves) * (hz < TOP_HZ))


dry = scene()
out = record(dry)
wrap_up_sound(out)
```